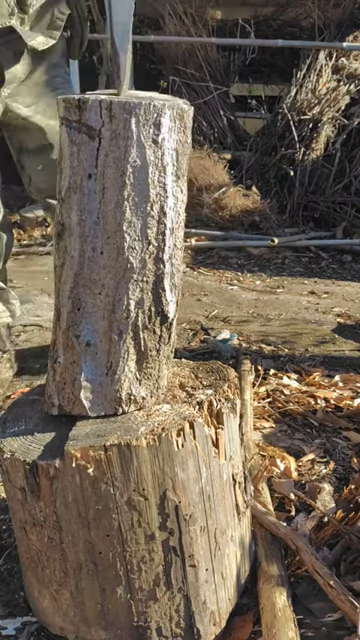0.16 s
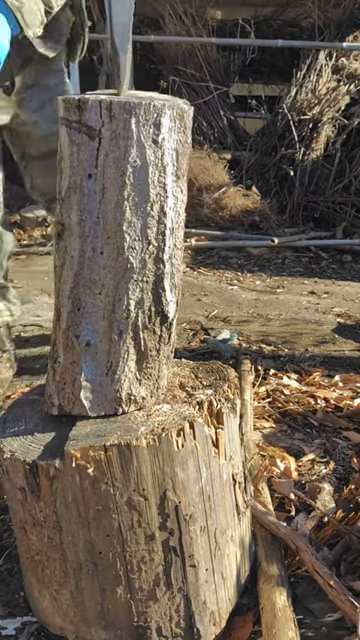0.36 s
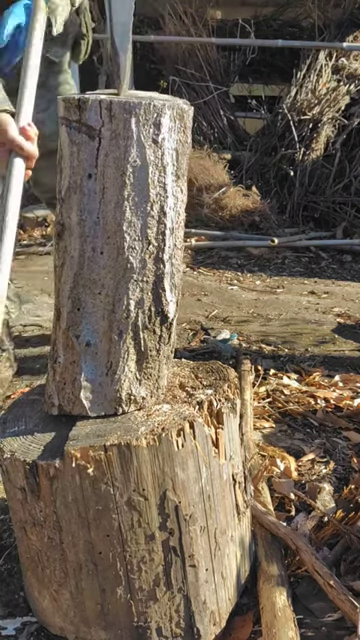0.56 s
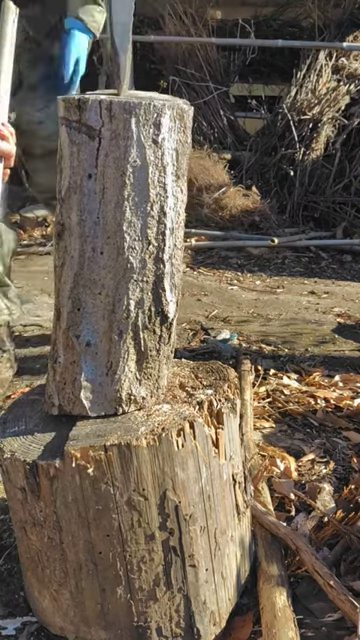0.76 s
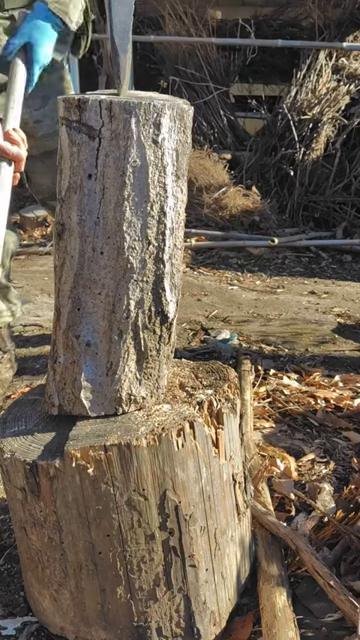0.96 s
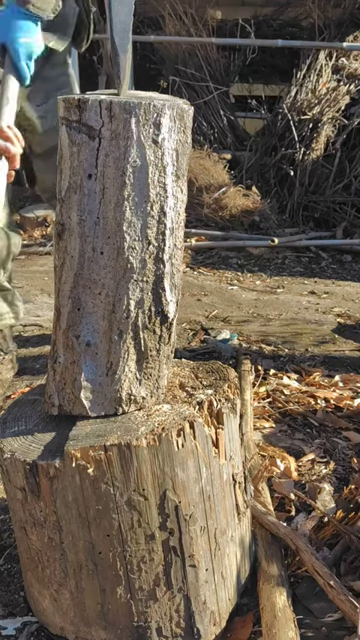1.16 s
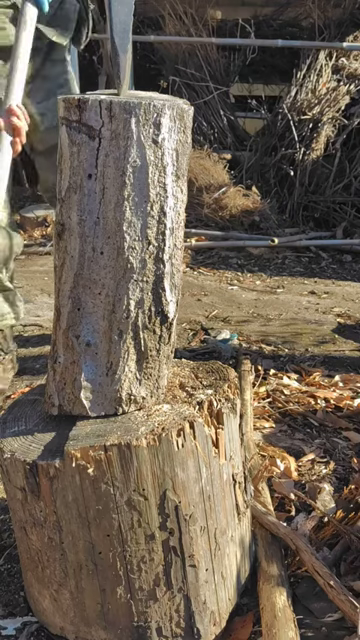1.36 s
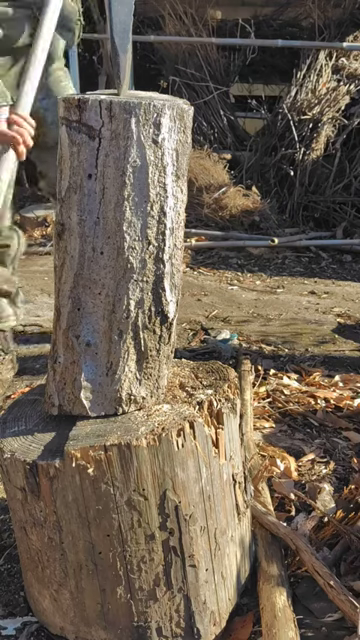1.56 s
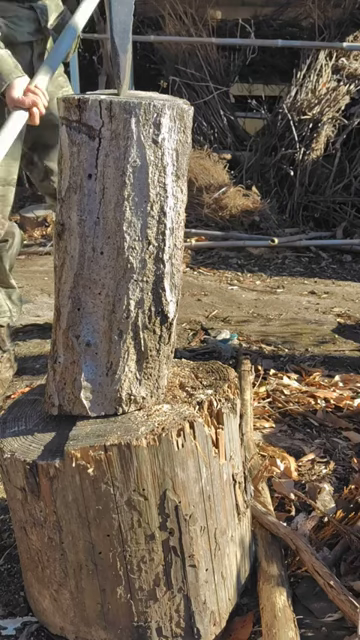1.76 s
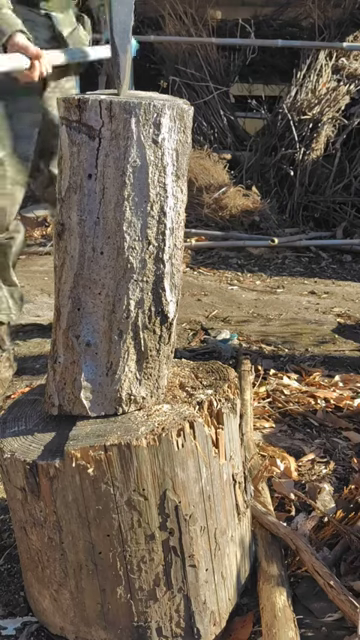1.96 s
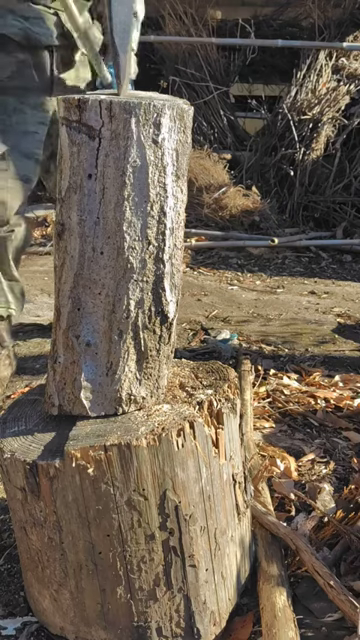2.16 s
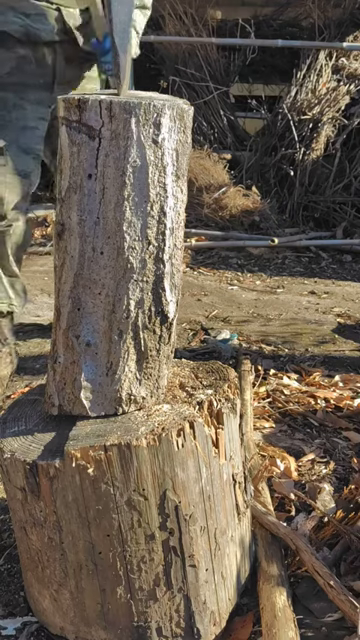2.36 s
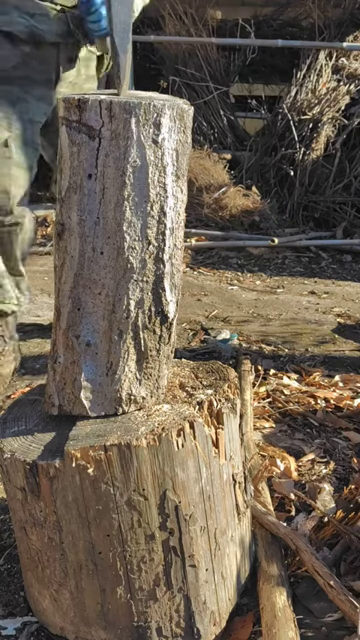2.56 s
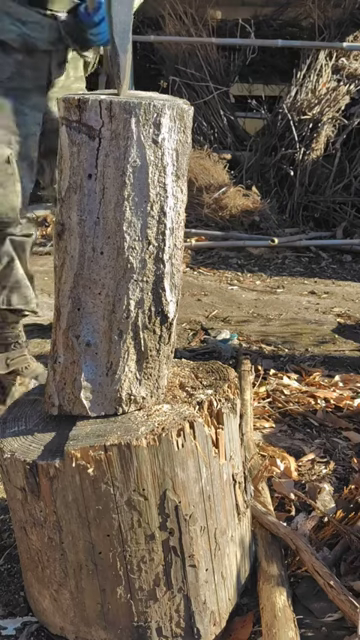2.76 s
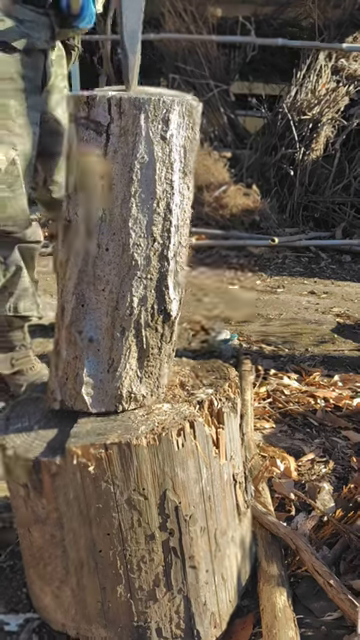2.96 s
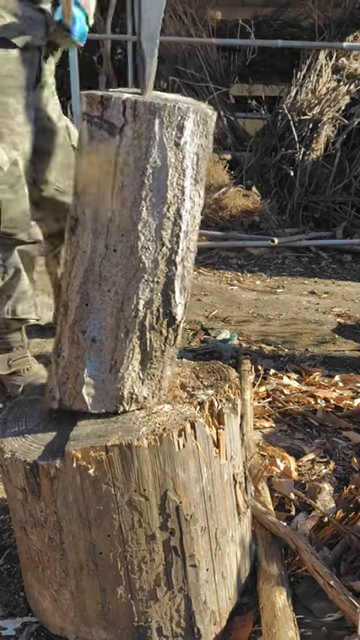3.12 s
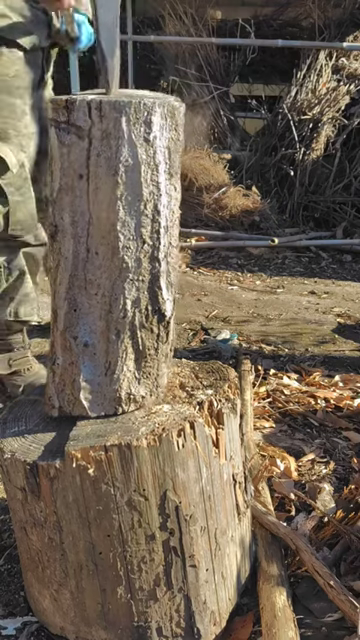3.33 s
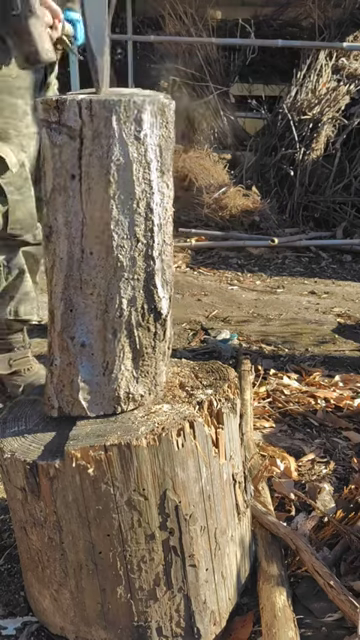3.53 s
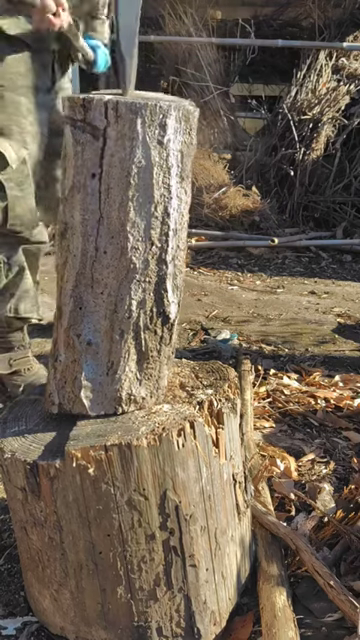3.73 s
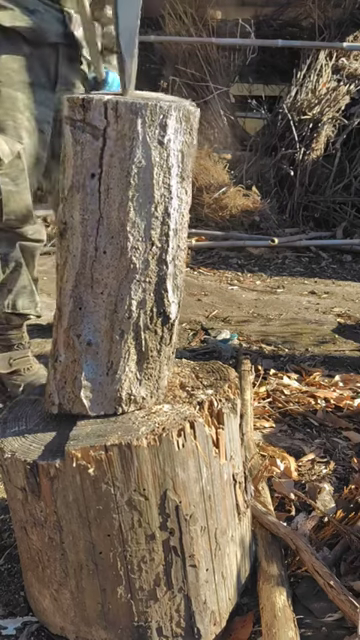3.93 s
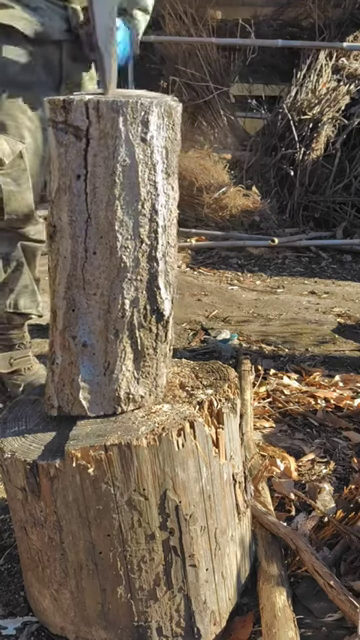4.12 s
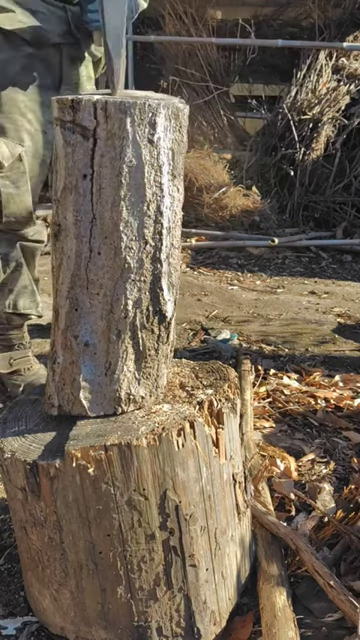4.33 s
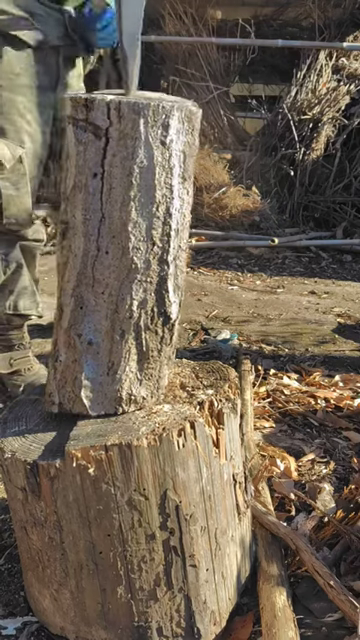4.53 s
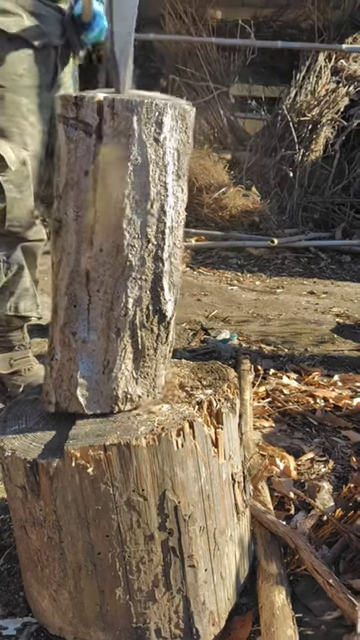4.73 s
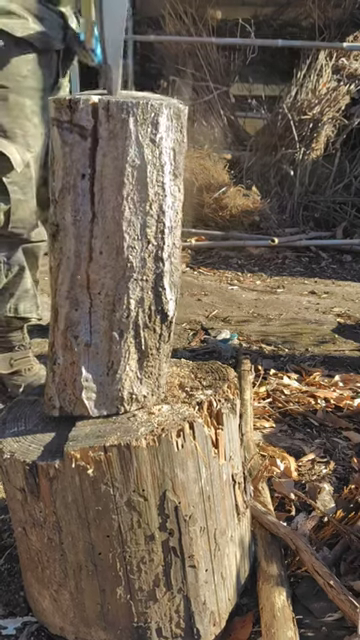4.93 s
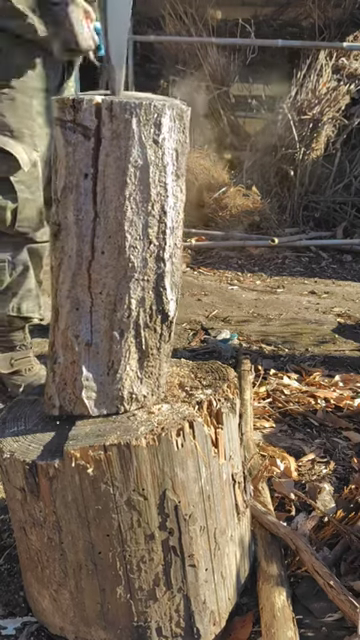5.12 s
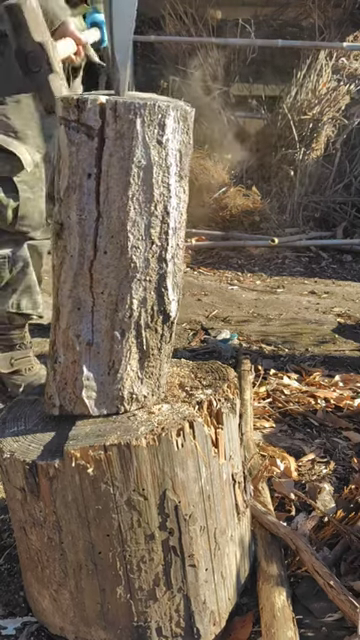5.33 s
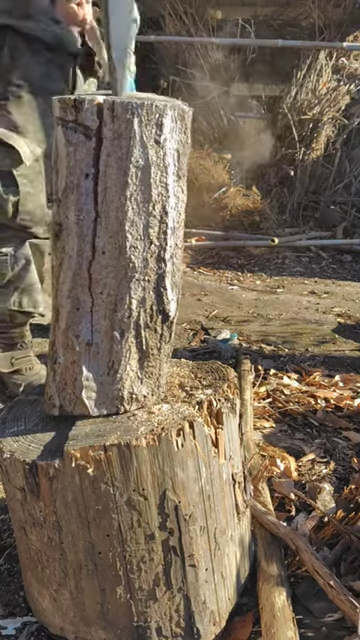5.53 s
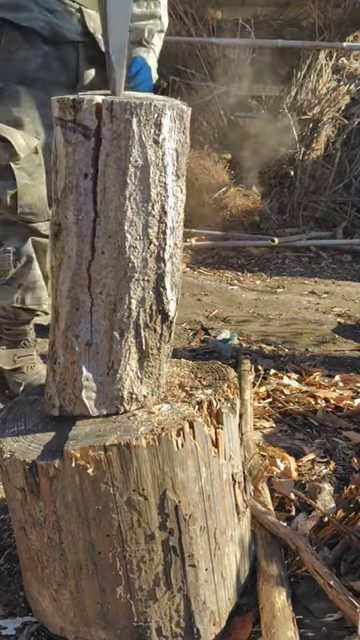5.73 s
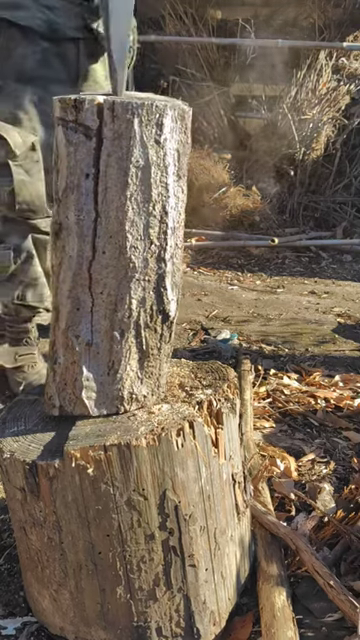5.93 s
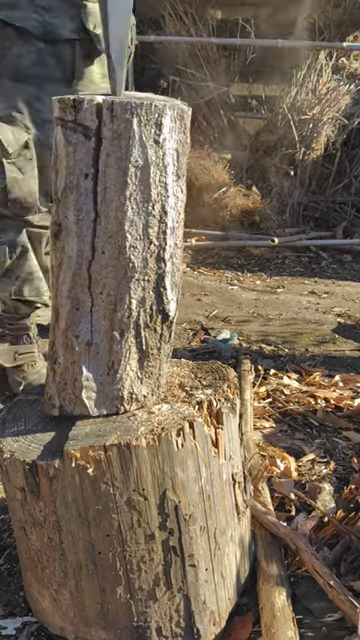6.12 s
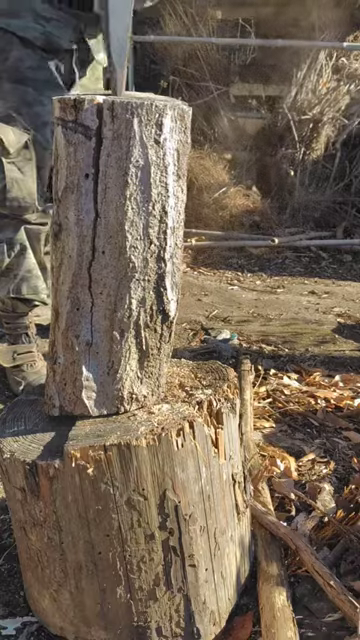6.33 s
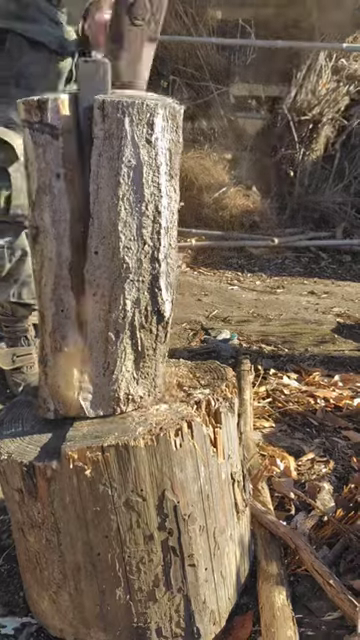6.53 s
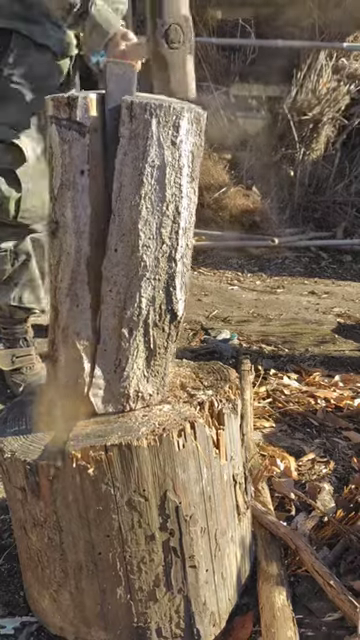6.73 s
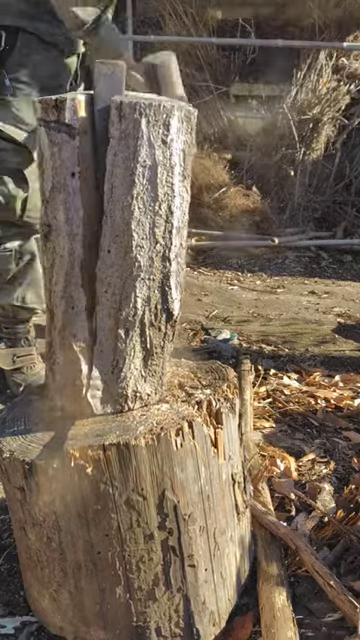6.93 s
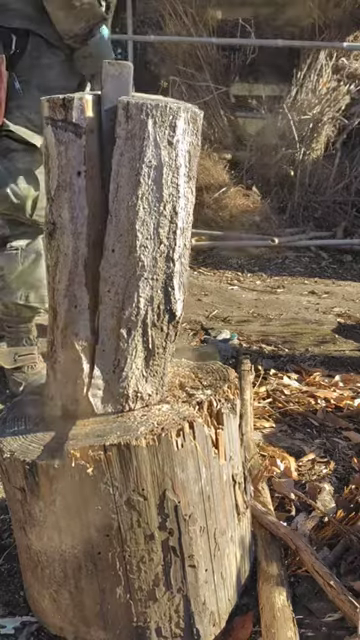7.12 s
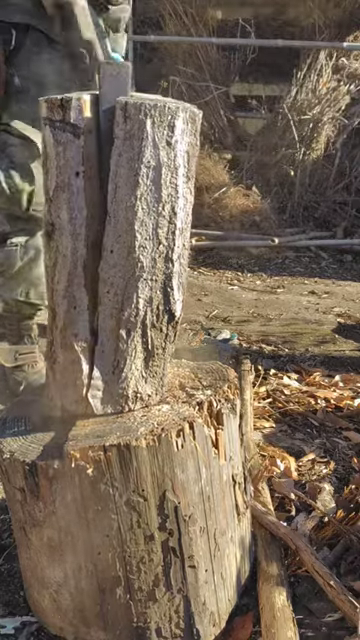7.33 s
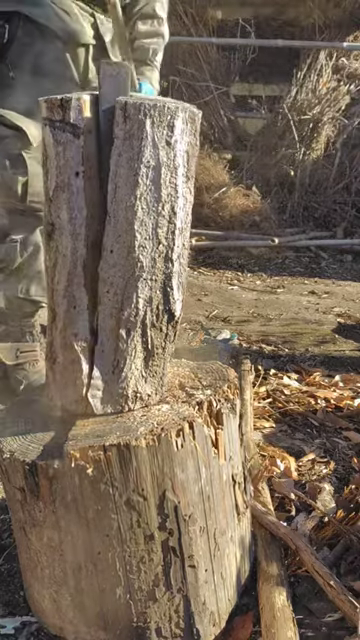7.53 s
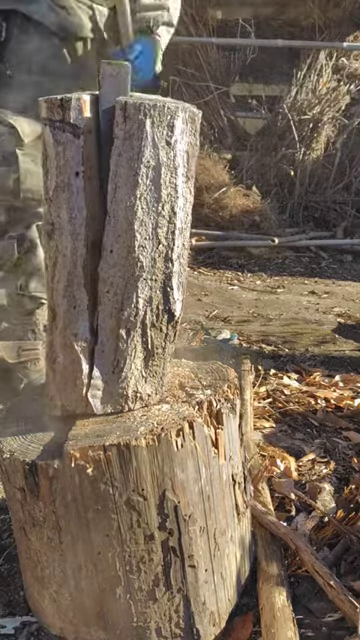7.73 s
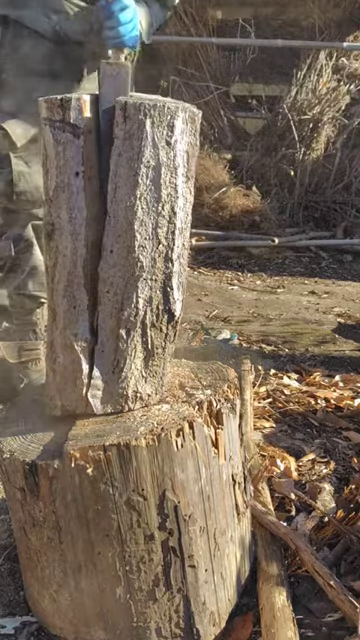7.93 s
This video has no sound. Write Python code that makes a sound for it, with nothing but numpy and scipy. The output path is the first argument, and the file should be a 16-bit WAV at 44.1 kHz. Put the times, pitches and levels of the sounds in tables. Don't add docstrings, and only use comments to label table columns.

```python
import sys
import numpy as np
from scipy import signal
from scipy.fft import rfft, irfft, next_fast_len
from scipy.io import wavfile
from scipy.ndimage import uniform_filter1d

SR = 44100
rng = np.random.default_rng(int(sys.argv[2]) if len(sys.argv) > 2 else 0)


def output_pcm(signal):
    pcm = np.clip(np.atleast_2d(signal).T, -1, 1) * 32767
    wavfile.write(sys.argv[1], SR, np.round(pcm).astype(np.int16))


def level_to_linear(level):
    exponent = np.asarray(level, float) / 20
    return 10 ** exponent


N = 351828
PAD = next_fast_len(N)
T = np.arange(N) / SR
HZ = np.fft.rfftfreq(PAD, 1 / SR)
PORT_LAG = 10.5

BLOW_S = [3.0082, 4.7276, 6.5694]

# peak time in seconds, peak level in dB, seconds to rise 20 dB,
# seconds to fall 20 dB, treble against peak level in dB.
CLOTHES_MOVES = [(.1, -62, 1.2, 1.2, -12), (1.15, -70, .1, .15, 8), (.38, -66, .8, .3, 14),
                 (.392, -52, .13, .09, -5), (.464, -47.5, .015, .15, -4), (.64, -53.5, .03, .2, -4),
                 (.991, -60, .01, .4, 2), (1.42, -64.5, .15, .05, -3), (1.545, -55.5, .13, .5, 1),
                 (2.189, -64.5, .25, .055, -3.5), (2.379, -60.5, .2, .5, -4), (2.771, -57.5, .05, .3, -5),
                 (2.97, -66, .3, .1, -1), (4.09, -57.5, .4, .3, -2.5), (4.69, -63, .18, .3, -1.5),
                 (5.268, -63, .5, .35, -6), (5.75, -62.5, .29, .9, -3), (6.06, -63, .6, .15, -5.5),
                 (6.452, -63.5, .22, .14, 0), (7.35, -64, 1.2, .35, -5), (7.622, -60, .075, .6, -6),
                 (7.95, -69, .8, .8, -11)]
# frequency in Hz, level in dB per Hz.
CLOTH_TONE = [(130, -5), (200, -11), (490, -4), (800, -9), (1600, -6.5), (2300, -14.5), (3010, -5.5),
              (3600, -20), (5400, -14), (6100, -22.5)]
TREBLE_TONE = [(6100, -14.5), (6700, -2.5), (7450, 2), (8200, -11.5), (9800, -17.5), (11200, -5.5),
               (12000, -7.5), (14000, -6), (14500, -40.5)]
RUMBLE_TONE = [(8.8, -29.5), (15, -3.5), (78, -2), (92, -5), (102, -15.5), (135, -13.5), (152, -27),
               (182, -27), (300, -31), (390, -55.5), (660, -120)]
# start in seconds, length in seconds,
# level change in dB.
RUMBLE_RIDE = [
    (.3, .55, 3),
    (3.05, .35, 6),
    (4.8, .37, -11),
    (6.61, .22, -7),
]
HUSH_S = [0.4962, 0.38, 0.42]

# start in seconds, peak level in dB,
# frequency in Hz, band edge ratio.
SCRAPES = [(.19, -58, 5200, 1.25), (.28, -53, 5300, 1.25), (.31, -52, 5500, 1.1), (.345, -50, 4500, 1.5),
           (.38, -51, 5400, 1.12), (.43, -53, 5300, 1.2), (.46, -52, 5300, 1.12), (.5, -53, 4500, 1.4),
           (.57, -60, 1250, 1.1), (.98, -60, 1100, 1.6), (1.165, -55, 5020, 1.3)]
GRIT_TICKS = [(.4645, -39, 1120, 1.5), (0.627, -42, 2870, 2.2), (0.9943, -39, 5100, 1.7),
              (1.5289, -44.5, 5000, 2), (.9943, -45, 1100, 1.7), (5.688, -50, 2000, 2.5),
              (.64, -47, 5300, 1.1), (.845, -54, 8000, 1.2), (2.7405, -49, 3030, 4), (2.7712, -39, 2730, 2),
              (2.9442, -55, 2980, 1.6), (6.4267, -50, 3020, 1.3), (7.6256, -53, 2890, 2),
              (7.665, -50, 2980, 1.1)]
CONTACTS = [(3.0073, -7.5, 3000, 2.3), (3.009, -16, 7640, 1.22), (4.4268, -45, 5230, 1.1),
            (4.4255, -52, 7380, 1.1), (4.7272, -10, 3300, 2.4), (5.2054, -30, 13700, 1.1),
            (5.2054, -35, 7500, 1.1), (5.2054, -43, 3000, 1.8), (6.569, -10, 3500, 2.2),
            (6.5712, -8, 3040, 1.1), (6.5788, -9, 4450, 1.1), (6.579, -15, 1500, 2),
            (6.5898, -13, 3000, 1.3), (6.6, -13, 3050, 1.2), (6.607, -14, 3100, 2.2),
            (6.597, -19, 5600, 1.1), (6.61, -18, 5600, 1.1), (6.619, -18, 5500, 1.15),
            (6.643, -20, 5500, 1.15), (6.646, -23, 3000, 1.15), (6.681, -27, 2900, 1.15),
            (3.096, -32, 3090, 1.1), (3.026, -22, 3000, 1.4), (4.733, -17, 4650, 1.15),
            (4.894, -39, 2950, 1.15), (6.626, -22, 4500, 1.3)]
# start in seconds, peak level in dB, frequency in Hz.
KNOCKS = [(0.344, -43, 1600), (0.377, -43, 455), (0.397, -39, 440), (0.479, -33.5, 323), (0.5, -42, 353),
          (0.633, -42.5, 1384), (0.736, -45, 305), (0.994, -44.5, 390), (2.442, -50, 366),
          (2.496, -51, 566), (2.77, -46.5, 600), (2.881, -48, 900), (5.203, -45, 1000), (5.279, -48, 950),
          (5.279, -40, 458), (5.329, -50, 490), (5.686, -54, 600), (5.828, -51.5, 606), (6.087, -49, 502),
          (6.919, -40.5, 506), (6.983, -38.5, 435), (7.142, -47.5, 926), (7.433, -54, 527),
          (7.624, -47, 490)]
# start in seconds, peak level in dB, frequency in Hz, T60 in seconds.
JOLTS = [(0.464, -24, 242, .022), (3.009, -15, 619, .03), (3.012, -10, 921, .012), (3.025, -19.5, 623, .03),
         (3.0865, -16, 370, .012), (4.727, -20, 420, .03), (4.732, -12.5, 816, .032),
         (4.737, -15, 736, .018), (6.568, -14.5, 605, .025), (6.572, -19, 280, .03),
         (6.571, -12, 1400, .025), (6.589, -13, 1400, .02), (6.606, -12, 950, .022),
         (6.625, -20.5, 1030, .039), (6.639, -10, 450, .018), (6.647, -20, 427, .03),
         (6.663, -24, 500, .041), (4.756, -22, 750, .05), (4.79, -30, 900, .03)]
# start in seconds, level in dB, frequency in Hz,
# T60 in seconds, sign of the first push.
THUDS = [(0.4654, -16, 95, 0.032, -1), (0.469, -18, 46, 0.076, 1), (0.485, -13.5, 41, 0.062, -1),
         (0.504, -20, 78, 0.064, 1), (0.549, -35.5, 39.3, 0.56, -1), (0.634, -31, 36, 0.23, 1),
         (3.017, -17, 22, .12, -1), (3.02, -27, 81, .15, 1), (3.055, -27, 66, .45, -1),
         (3.10, -24, 5, 0.81, 1), (4.729, -28, 87, 0.09, -1), (6.572, -25.5, 55, .1, -1),
         (6.64, -46.5, 110, 0.32, -1), (6.78, -44, 140, .12, 1), (6.985, -40, 150, .1, -1)]

# peak level in dB, time to peak in seconds, swell in dB, T60 in seconds.
RINGS = [
    [(-17, .15, 1, .54), (-10, .16, 6, .55), (-26, .07, 2, .95)],
    [(-26, .16, 3, .5), (-18, .18, 16, .45), (-32, .06, 2, .72)],
    [(-38.5, .03, 0, 1.6), (-41, .005, 0, 1.5), (-43.5, .3, -8, 1.7)],
    [(-29, .026, 0, .3), (-25, .03, 8, .36), (-22.5, .047, 19, .76)],
    [(-36, .026, 0, .31), (-32, .03, 5, .32), (-19.5, .047, 16, .335)],
]
# time in seconds, dip in dB (negative revives), half width in seconds.
RING_DIPS = [
    [(3.085, 9, .03), (3.18, 4, .03), (3.211, 28, .025), (3.3, 5, .04), (3.388, 14, .012), (3.41, -7, .06),
     (4.858, 7, .02), (4.918, 8, .025), (4.966, 13, .025), (5.04, 5, .04), (5.088, 11, .025),
     (6.657, 8, .025), (6.718, 10, .022), (6.754, 17, .016)],
    [(3.122, 17, .035), (3.211, 12, .02), (4.946, 40, .022), (5.0, 8, .04), (6.705, 14, .04)],
    [(3.098, 6, .03), (3.142, -9, .045), (3.246, -6, .04), (4.88, -6, .04), (5.206, -10, .03)],
    [(3.098, 11, .045), (5.206, -18, .03), (6.585, 12, .016)],
    [(3.098, 7, .04), (5.206, -14, .03), (6.578, 10, .014), (6.6, -7, .02), (6.65, 2, .012),
     (6.725, 5, .015), (6.745, -4, .015), (6.8, 5, .02)],
]
RING_BEND = [.95, .95, .7, .95, .95]
RING_END_S = [3.85, 5.6, 7.45]
# left minus right in dB for thin, middle and low partial.
RING_PAN_DB = [(-2, -3.5, 6), (0.5, -3, -0.5), (-2, 3.5, -2)]
# frequency in Hz, cluster width in Hz.
MIDDLE_RING = [
    (7630, 90),
    (7665, 100),
    (7487, 8),
]
MODE_HZ = [13925, 9592, 4455, 7893, 11440, 12690, 13440, 10980, 10200, 9050, 12270, 3050, 4478, 4432]
# T60 in seconds, level in dB at blows 1, 2 and 3, left minus right in dB.
MODES = [(.8, -42.5, -36, -33, 13.5), (.6, -99, -99, -34, 5), (.45, -55, -54, -23, -5.5),
         (1, -50.5, -49.5, -34.5, 2), (0.19, -33.5, -27, -33, 4), (.18, -50, -35, -33.5, 3.5),
         (0.11, -48, -37.5, -26.5, 1), (0.053, -36, -35.5, -30.5, 0.5), (0.072, -38, -43.5, -34.5, 3),
         (.09, -58, -42.5, -34, 3.5), (.1, -38, -37, -33, 2.5), (0.17, -35.5, -33, -24.5, 2.5),
         (0.36, -55.5, -50, -30, -2), (.34, -55, -56, -30, -5)]
# time in seconds, dip in dB, half width in seconds.
WEDGE_CHOKES = [(6.572, 6, .007), (6.638, 14, .013), (6.667, 7, .006), (6.79, 5, .03), (6.87, 5, .04),
                (7.0, 12, .08)]
# seconds after the blow, drop in dB.
DAMPED = [(.76, 8), (.72, 6), (.46, 13)]

# level in dB, fibres hold in seconds, T60 in seconds, last echo in seconds.
SPLIT_BODY = [(-19.5, .004, .8, .447), (-23.5, .004, .95, .385), (-27, .065, 1.0, .43)]
# level in dB, hold in seconds, T60 in seconds.
SPLIT_BRIGHT = [(-29, .012, .72), (-24.5, .012, .5), (-25, .065, .12)]
# level in dB, T60 in seconds, seconds until the fibres let go.
SPLINTER = [(-24.5, 0.067, 0.0075), (-30, 0.26, 0.038), (-28.5, 0.38, 0.0683)]
# boom in dB, sizzle in dB.
SPLIT_COLOUR = [
    (-1, 1),
    (-6, 3),
    (1, -3),
]
# frequency in Hz, level in dB per Hz.
WOOD_TONE = [(120, -7), (500, -6.5), (900, -4), (1360, -6), (2400, -11.5), (3050, -4.5), (3800, -14),
             (5600, -7), (6120, -32), (6900, -15), (7700, -11.5), (8250, -19), (8500, -72)]
# time in seconds, lift in dB, dies in seconds.
SLAPS = [(3.096, 4, .012), (3.1216, 5, .05), (3.1445, 3, .015), (3.29, 2, .04), (3.365, 5, .08),
         (4.76, 2, .03), (4.89, 3, .03), (5.005, 3, .03), (6.74, 2, .04), (6.85, 3, .05)]


def colour(x, table, lo_hz, hi_hz):
    f, db = np.transpose(table)
    band = 1 / np.sqrt((1 + (lo_hz / (HZ + 1)) ** 12) * (1 + (HZ / hi_hz) ** 12))
    gain = level_to_linear(np.interp(np.log(HZ + 1), np.log(f), db)) * band
    y = irfft(rfft(x, PAD) * gain, PAD)[..., :N]
    return y / np.sqrt(np.mean(y ** 2))


def walk(rate):
    k = int(SR / rate)
    held = np.repeat(rng.standard_normal(N // k + 1), k)
    return 1.1 * uniform_filter1d(uniform_filter1d(held, k), k)[:N]


def pan(x, db):
    return x * level_to_linear(np.multiply.outer([.5, -.5], db * np.ones(x.shape[-1])))


def ports(x, alike, lag):
    share = np.clip(alike, 0, 1)
    late = irfft(rfft(x[0], PAD) * np.exp(-2j * np.pi * HZ * lag / SR), PAD)[:N]
    return np.sqrt(share) * np.array([x[0], late]) + np.sqrt(1 - share) * x[1:]


def grainy(rate, size_db, share):
    size = level_to_linear(size_db * np.minimum(rng.exponential(1, (3, N)), 2.5))
    hit = (rng.random((3, N)) < rate / SR) * size * rng.choice([-1, 1], (3, N))
    return rng.standard_normal((3, N)) + share * hit / hit.std()


def add(out, s, x):
    i = int(s * SR)
    out[:, i:i + x.shape[1]] += x[:, :N - i]


def fall(t, t60, bend):
    return 60 * (np.maximum(t, 0) / t60) ** bend


def dips(time, rows):
    return sum(dip_db * np.maximum(1 - np.abs(time - s) / half, 0) for s, dip_db, half in rows)


def moves(steep, treble):
    t = T[::32]
    each = [level_to_linear(db + treble * top_db - 20 * steep * np.maximum((s - t) / rise, (t - s) / drop))
            for s, db, rise, drop, top_db in CLOTHES_MOVES]
    return np.interp(T, t, np.sqrt(np.sum(np.square(each), axis=0)))


def yard():
    rub = ports(grainy(rate=2700, size_db=4.5, share=1.0), alike=.78, lag=PORT_LAG)
    air = ports(rng.standard_normal((3, N)), alike=.38, lag=PORT_LAG)
    ground = ports(rng.standard_normal((3, N)), alike=.88, lag=PORT_LAG)
    ride_db = sum(db * ((T > s) & (T < s + lasts)) for s, lasts, db in RUMBLE_RIDE) * 1.
    duck = level_to_linear(uniform_filter1d(ride_db, int(.09 * SR)))

    low = colour(rub, CLOTH_TONE, 130, 6100) * moves(steep=1, treble=0) * level_to_linear(1.5 + 2.5 * walk(rate=30))
    high = colour(rub, TREBLE_TONE, 6100, 17000) * moves(steep=1.4, treble=1) * level_to_linear(-3 + 1.5 * walk(rate=25))
    low += colour(air, CLOTH_TONE, 130, 6100) * level_to_linear(-68.3) * duck
    high += colour(air, TREBLE_TONE, 4300, 15000) * level_to_linear(-77.8) * duck
    hush = sum((T > s0) & (T < s0 + hold) for s0, hold in zip(BLOW_S, HUSH_S))
    high *= level_to_linear(-25 * uniform_filter1d(1. * hush, size=3000))
    rumble = colour(ground, RUMBLE_TONE, 12, 260) * duck * level_to_linear(-51.5 + .56 * walk(rate=4))
    return pan(low, 3.6) + pan(high, 12) + rumble


def taps(rows, purity, crest_db, delay_s, skew, side_db, scatter_db):
    out, t = np.zeros((2, N)), np.arange(SR // 10) / SR
    puffs = rng.standard_normal((len(rows), 2, len(t)))
    for (s, db, hz, t60, span), puff in zip(rows, puffs):
        span, side = max(span, 1.1), side_db + scatter_db * puff[0, -1]
        turn = skew * puff[:, :1] * hz / 1000
        edges = [hz / span, min(hz * span, 14500)]
        puff = signal.sosfilt(signal.butter(2, edges, "bandpass", fs=SR, output="sos"), puff)
        x = purity * np.sin(2 * np.pi * hz * t + turn) + (1 - purity) * puff / puff.std()
        attack = np.minimum(t / max(.25 / hz, t60 / 20 - .004), 1)
        x = x * level_to_linear(-60 * t / max(t60, .004)) * attack
        x *= level_to_linear(db + crest_db) / np.abs(x).max(axis=1, keepdims=True)
        add(out, s + delay_s, pan(x, side))
    return out


def sharp_taps(rows, t60):
    rows = [(s, db, hz, t60, ratio) for s, db, hz, ratio in rows]
    return taps(rows, purity=.4, crest_db=3.5, delay_s=.00055, skew=.1, side_db=1.5, scatter_db=2)


def scrapes():
    return sharp_taps(SCRAPES, t60=.45)


def knocks():
    rows = [(*row, .035, 1.9) for row in KNOCKS]
    return taps(rows, purity=.5, crest_db=0, delay_s=.0012, skew=.9, side_db=.5, scatter_db=2)


def jolts():
    rows = [(*row, 1.6) for row in JOLTS]
    return taps(rows, purity=.8, crest_db=0, delay_s=.0012, skew=.9, side_db=.3, scatter_db=1.5)


def grit():
    return sharp_taps(GRIT_TICKS, t60=.026)


def thuds():
    out, t = np.zeros((2, N)), np.arange(SR // 2) / SR
    opposite = np.array([[1], [-1]])
    for s, db, hz, t60, sign in THUDS:
        skew = .6 * np.minimum(t * hz, 1) * opposite / 2
        shake = np.sign(sign) * np.sin(2 * np.pi * hz * t + skew)
        add(out, s, pan(shake * level_to_linear(db - 60 * t / t60), -4 * (s > 1)))
    return out


def contacts():
    return sharp_taps(CONTACTS, t60=.015)


def ring(which, blow, t):
    db, peak_s, swell_db, t60 = RINGS[which][blow]
    db = db - swell_db * np.maximum(1 - t / peak_s, 0) - fall(t - peak_s, t60, RING_BEND[which])
    db = db - dips(t + BLOW_S[blow], RING_DIPS[which])
    return uniform_filter1d(db, size=400)


def steel():
    out = np.zeros((2, N))
    for k, (s0, s1) in enumerate(zip(BLOW_S, RING_END_S)):
        t = np.arange(int((s1 - s0) * SR)) / SR

        def waver(db):
            return db * np.array([walk(rate=75)[:len(t)], walk(rate=80)[:len(t)]])

        drift = waver(.55) + np.array([[0], [np.pi / 2]])

        def tone(hz):
            return np.sqrt(2) * np.sin(2 * np.pi * hz * t + rng.uniform(0, 2 * np.pi) + drift)

        hz, width = MIDDLE_RING[k]
        if width > 20:
            middle = sum(tone(hz + width * d) for d in rng.uniform(-.7, .7, 5)) / np.sqrt(5)
        else:
            middle = tone(hz)
        level = [ring(which, k, t) for which in range(len(RINGS))]
        let_go_db = 22 * np.exp(-t / .012)
        x = tone(11853) * level_to_linear(np.array(level[:2]) - let_go_db + waver(1.3))
        for y, db, side in zip((tone(8052), middle, tone(6519)), level[2:], RING_PAN_DB[k]):
            x += pan(y * level_to_linear(db + 4 + waver(2.2)), side)

        shake = waver(3.5)
        choke = dips(t + s0, WEDGE_CHOKES)
        for m, (hz, (t60, *db, side)) in enumerate(zip(MODE_HZ, MODES)):
            mode_db = db[k] - 60 * t / t60 - choke * (4000 < hz < 5000)
            x += pan(tone(hz) * level_to_linear(mode_db + np.roll(shake, 997 * m, axis=1)), side)
        damp_s, damp_db = DAMPED[k]
        x *= level_to_linear(-damp_db * np.clip((t - damp_s) / .03, 0, 1))
        add(out, s0, x * np.minimum(t / .002, 1) * np.minimum((t[-1] - t) / .1, 1))
    return out


def log():
    tear = ports(grainy(rate=700, size_db=6.5, share=1.2), alike=.5, lag=2.7)
    plain_body = colour(tear, WOOD_TONE, 130, 2200)
    plain_bright = colour(tear, WOOD_TONE, 2600, 8300)
    boom = signal.sosfiltfilt(signal.butter(3, 400, "low", fs=SR, output="sos"), plain_body)
    sizzle = signal.sosfiltfilt(signal.butter(3, 3700, "high", fs=SR, output="sos"), plain_bright)
    top = colour(tear, TREBLE_TONE, 8400, 15000)

    slap = sum(db * (T >= s) * np.exp(-np.abs(T - s) / dies) for s, db, dies in SLAPS)
    slap = uniform_filter1d(slap, size=120)
    patch = level_to_linear(.6 * slap + 1.5 * walk(rate=60))
    bright_patch = level_to_linear(slap + 1.5 * walk(rate=90))

    out = np.zeros((2, N))
    for k, s0 in enumerate(BLOW_S):
        body_db, grip, body_t60, last = SPLIT_BODY[k]
        bright_db, bright_s, bright_t60 = SPLIT_BRIGHT[k]
        top_db, top_t60, hold = SPLINTER[k]
        boom_db, sizzle_db = SPLIT_COLOUR[k]
        t = T - s0
        live = (t >= 0) * level_to_linear(-150 * np.maximum(t - last, 0))
        body = plain_body + (level_to_linear(boom_db) - 1) * boom
        bright = plain_bright + (level_to_linear(sizzle_db) - 1) * sizzle
        out += live * patch * body * level_to_linear(body_db + 2 - fall(t - grip, body_t60, .47))
        loss = fall(np.maximum(t, bright_s), bright_t60, .35) - fall(bright_s, bright_t60, .35)
        out += live * bright_patch * bright * level_to_linear(bright_db + 1.1 - loss)
        out += live * top * level_to_linear(top_db - 60 * np.maximum(t, 0) / top_t60 - 3000 * np.maximum(t - hold, 0))
    return out


def scene():
    small = yard() + scrapes() + knocks() + jolts() + grit() + thuds()
    return small + contacts() + steel() + log()


def roll_off(x):
    return signal.sosfilt(signal.butter(12, 16980, fs=SR, output="sos"), x)


def record(dry):
    dull = signal.sosfilt(signal.ellip(4, .3, 30, 14500, fs=SR, output="sos"), dry)
    notched = signal.lfilter(*signal.iirnotch(6130, 14, SR), dull)
    mix = np.clip(.3 * dull + .7 * notched, -.98, .98)
    return roll_off(mix)


dry = scene()
out = record(dry)
output_pcm(out)
```